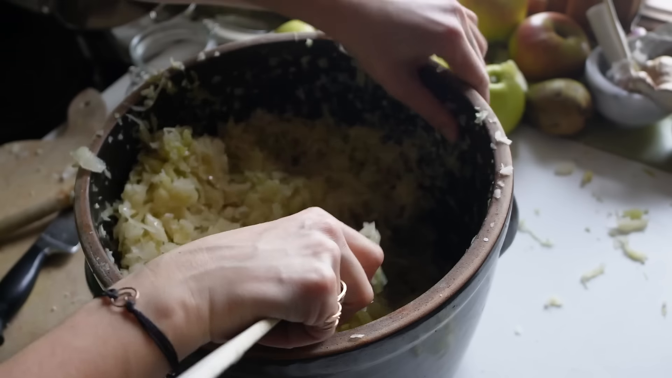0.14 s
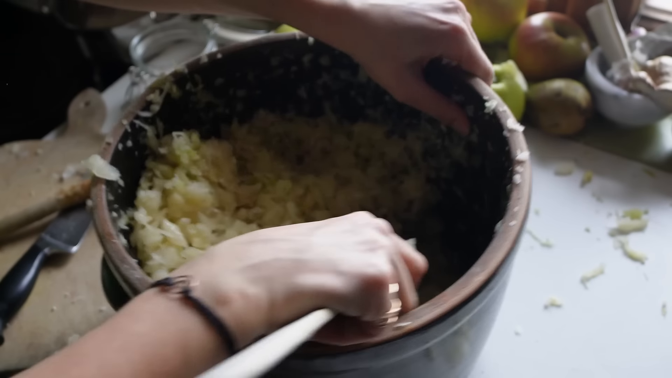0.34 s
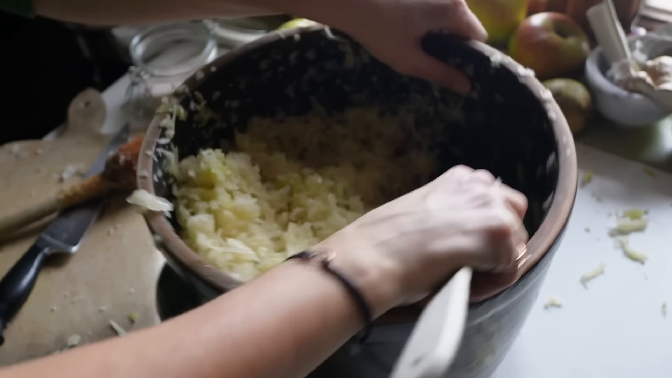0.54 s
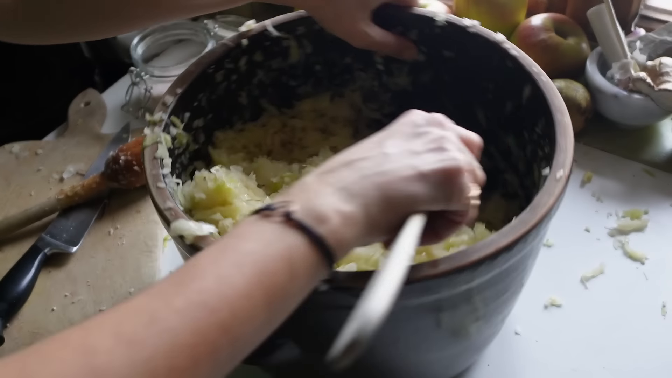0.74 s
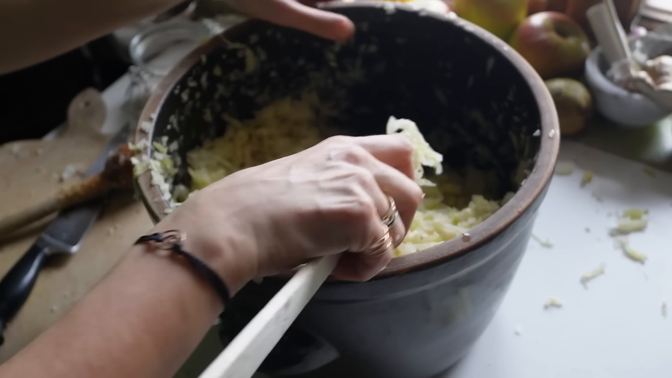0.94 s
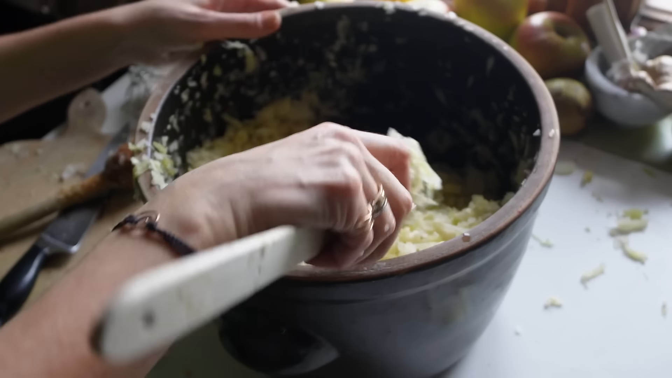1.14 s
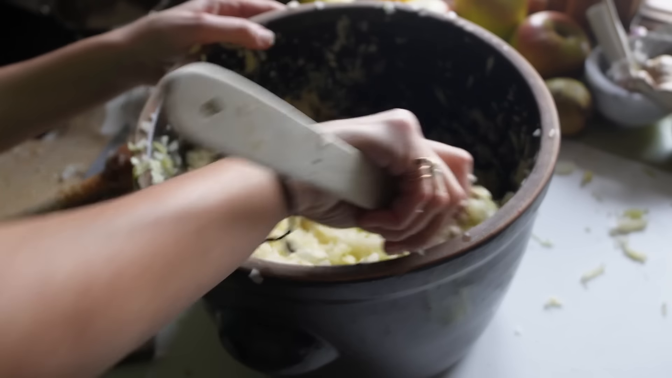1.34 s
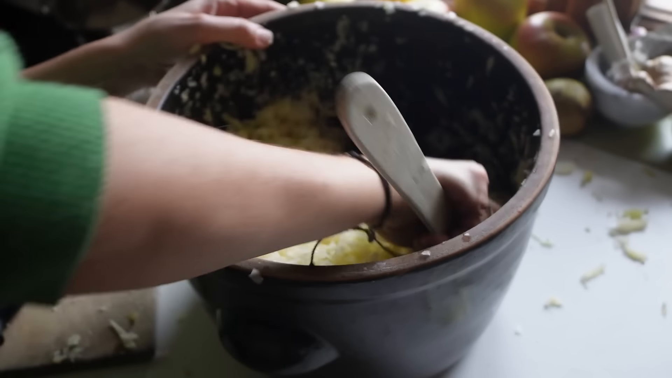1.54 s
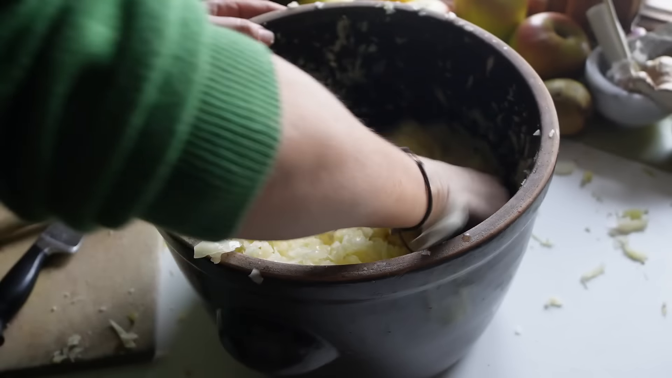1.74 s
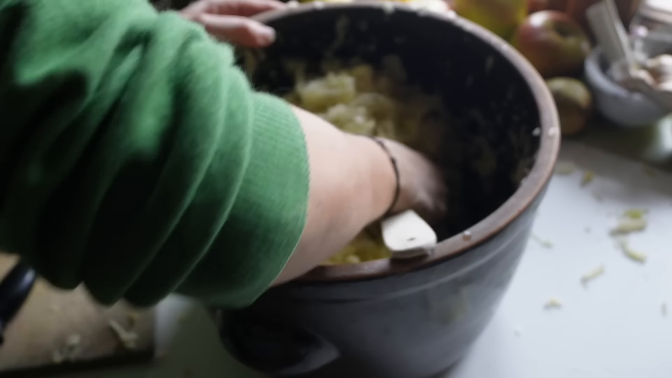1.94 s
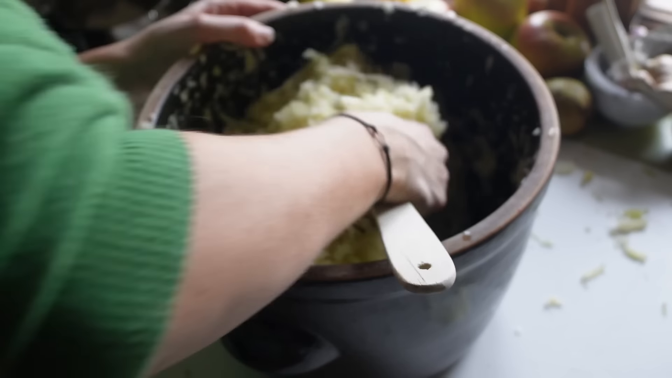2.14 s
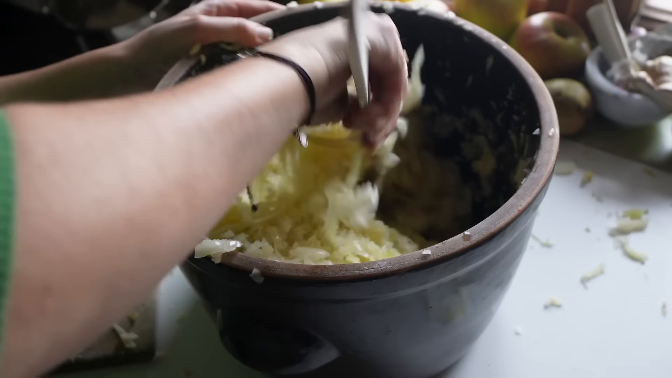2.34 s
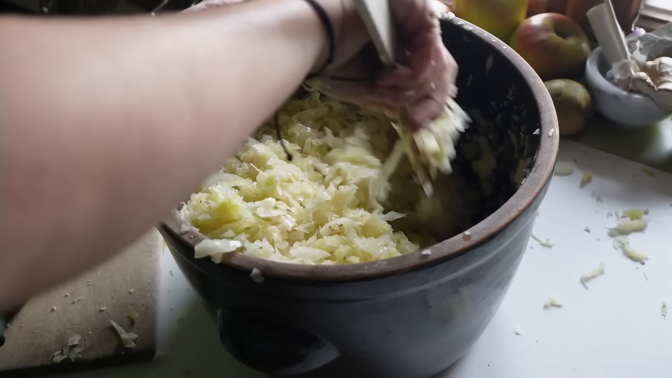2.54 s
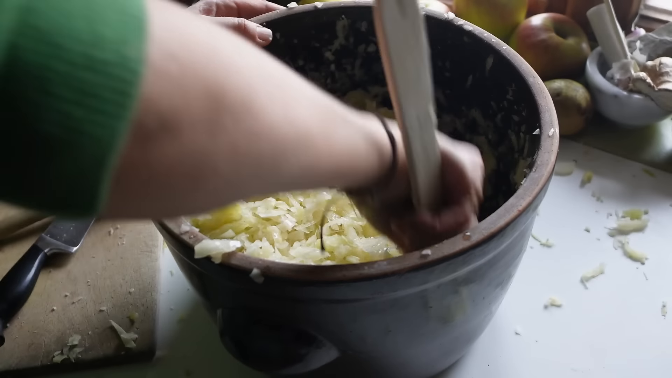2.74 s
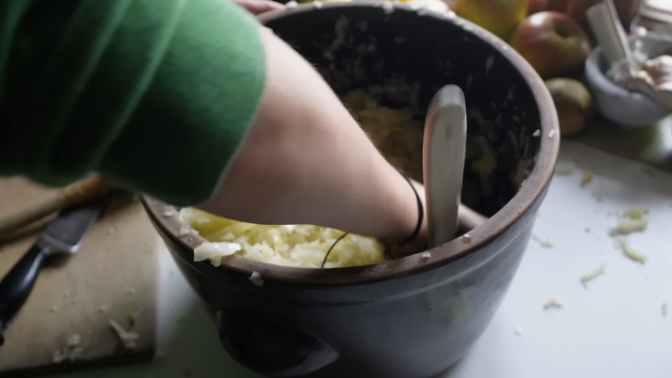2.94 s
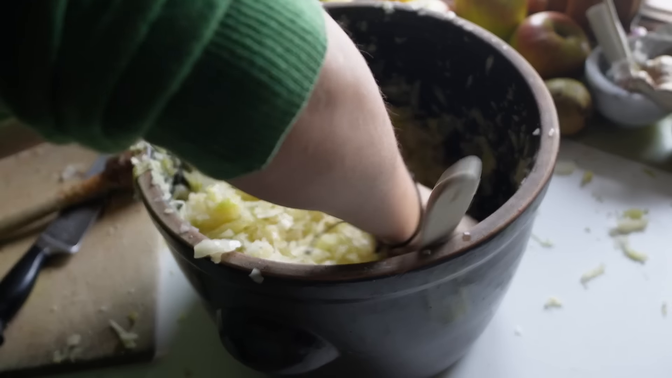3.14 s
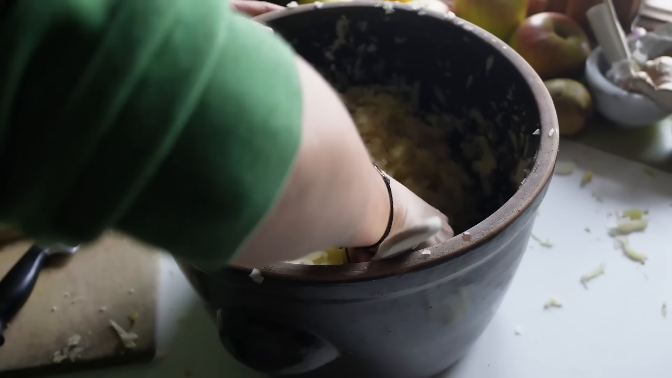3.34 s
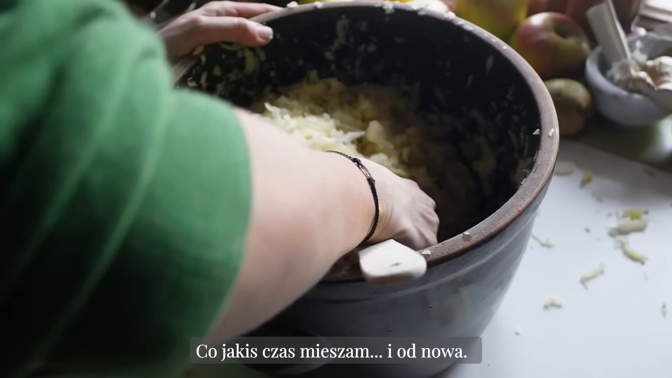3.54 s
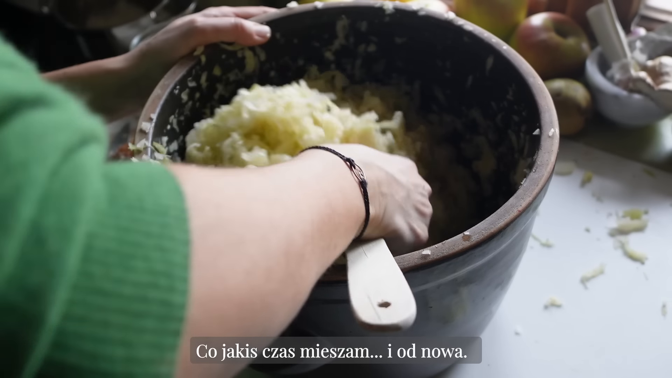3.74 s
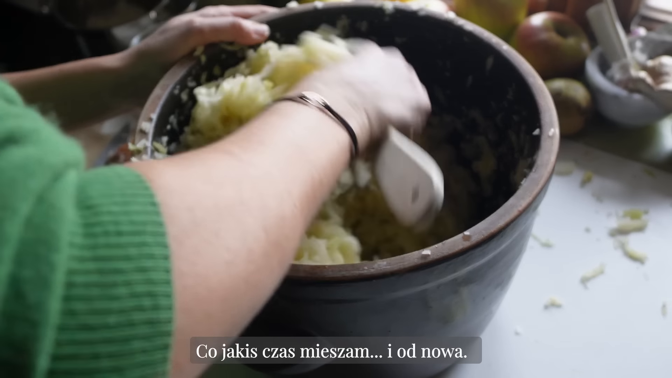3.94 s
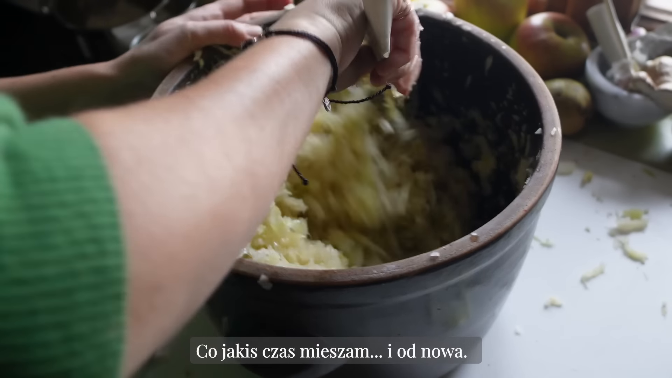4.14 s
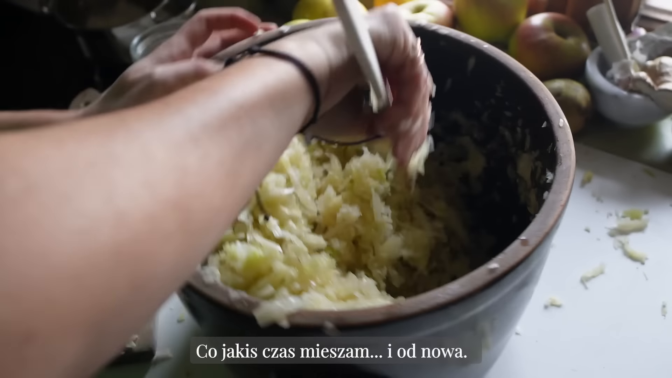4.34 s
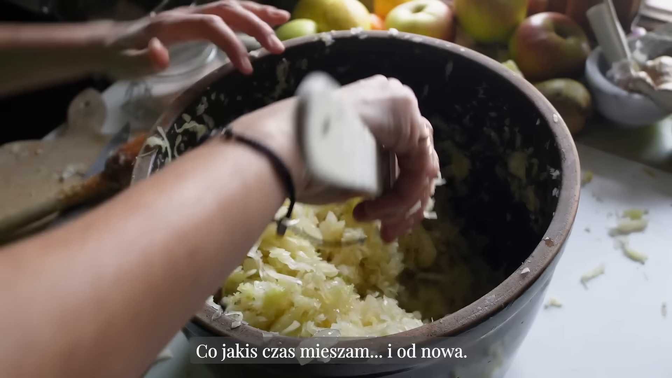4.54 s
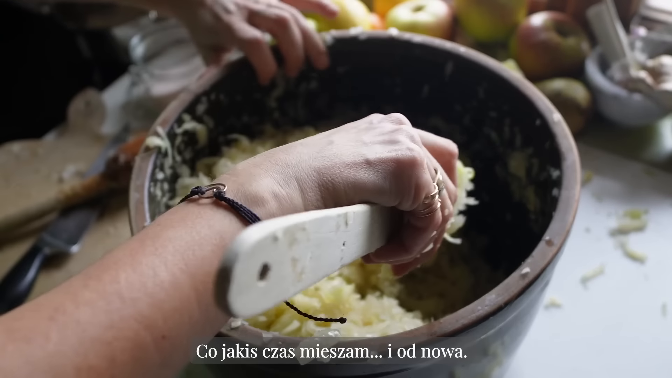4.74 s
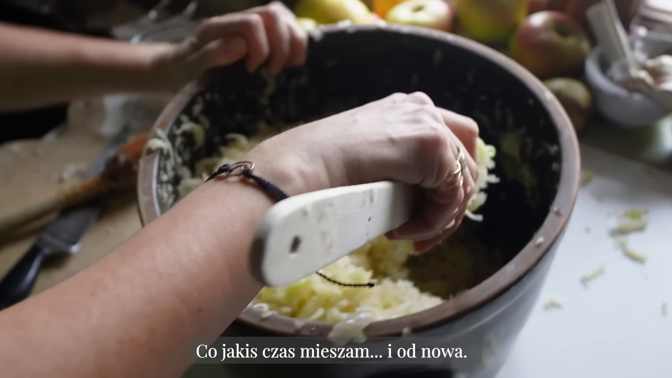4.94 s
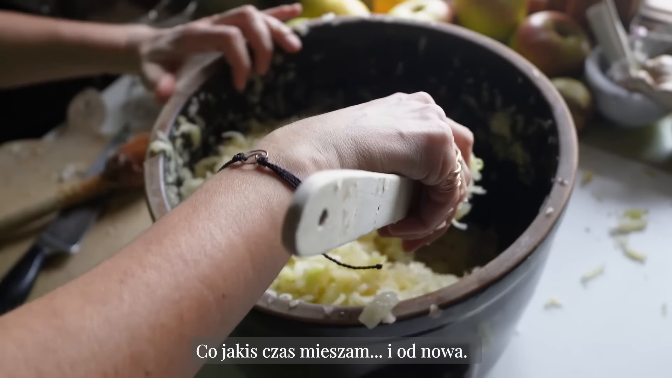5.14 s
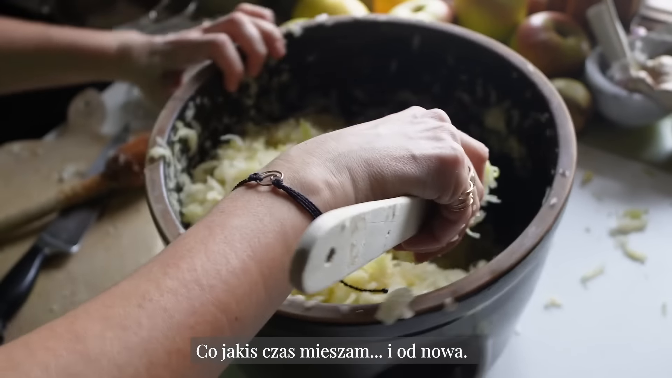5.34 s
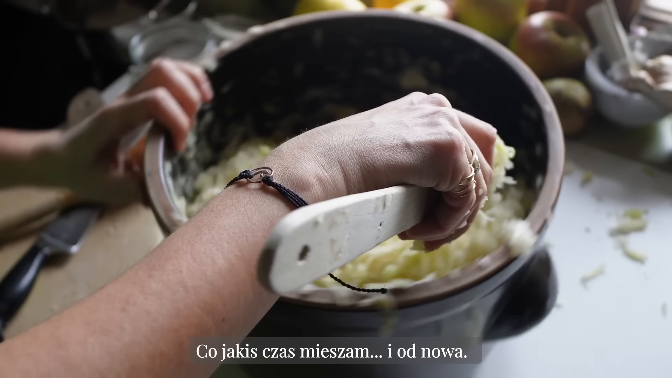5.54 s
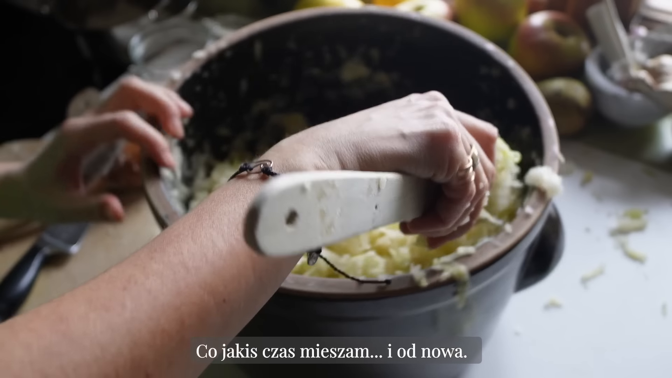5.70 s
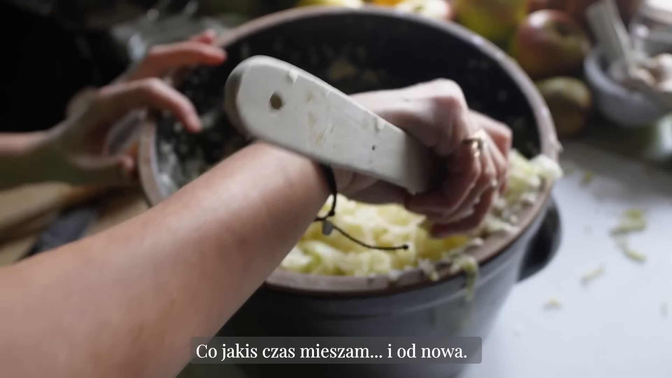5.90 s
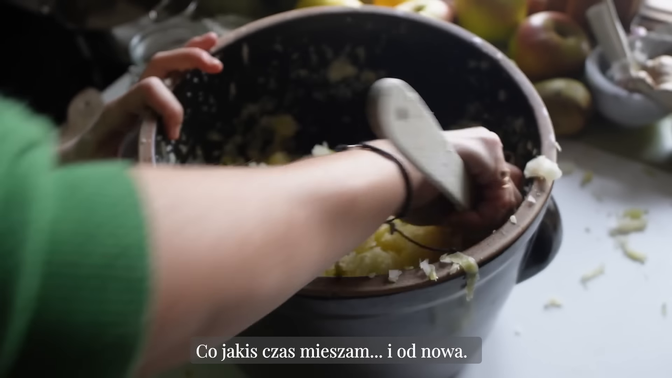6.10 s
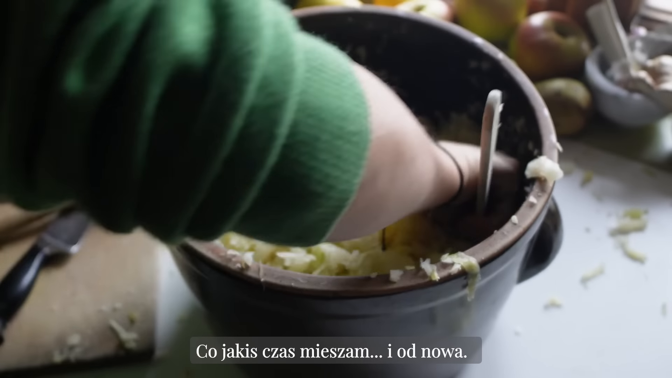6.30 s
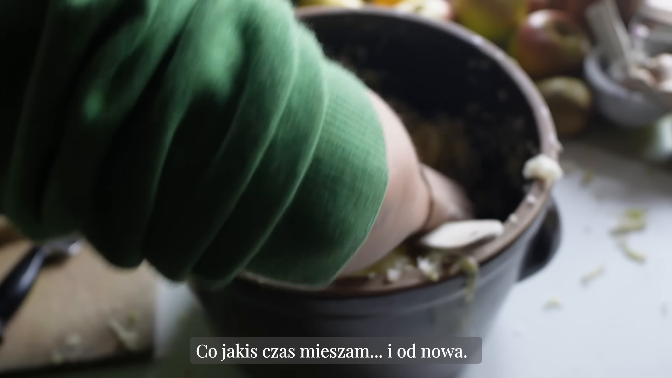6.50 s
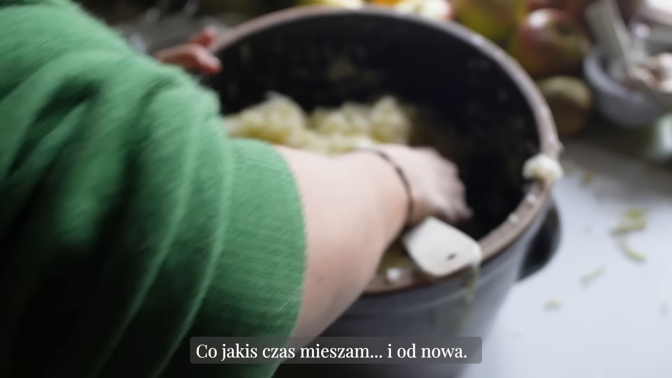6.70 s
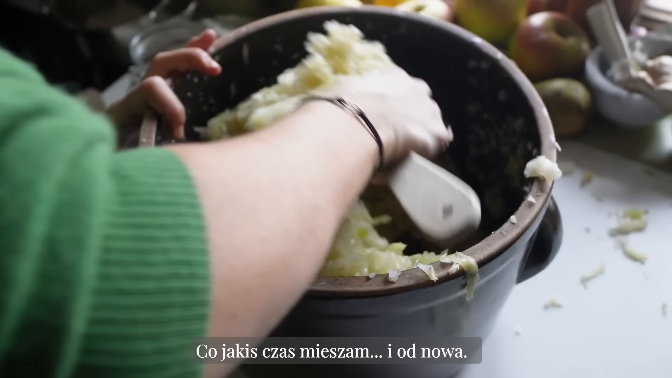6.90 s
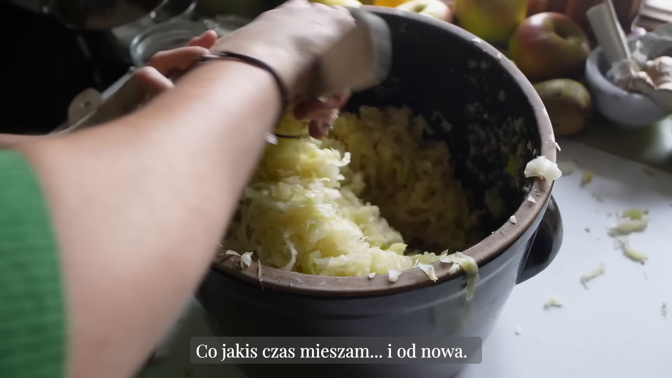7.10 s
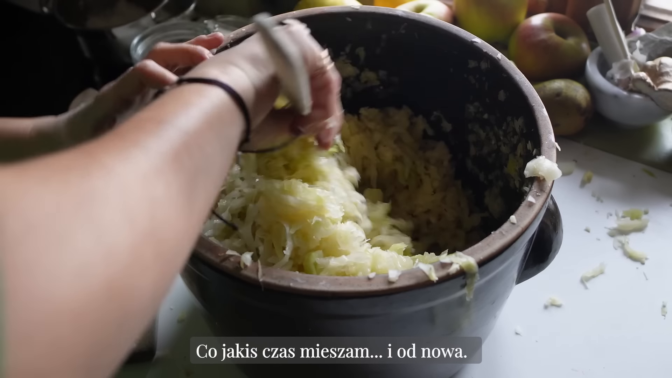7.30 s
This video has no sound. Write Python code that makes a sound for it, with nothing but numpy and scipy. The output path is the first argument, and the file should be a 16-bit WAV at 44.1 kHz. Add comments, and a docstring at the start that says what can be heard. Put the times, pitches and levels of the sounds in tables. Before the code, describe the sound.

A close microphone in a small kitchen picks up a low, steady room tone and slight reverberation. From about 0.3 to 1 second a heavy stoneware crock grinds round on a table, with dull thuds. From 1.4 to 4 seconds a hand turns wet shredded cabbage in soft, crackling squelches. A spatula scuffs and clacks on the wall near 1.8 seconds and clacks sharply at 2.7; the crock rocks with two thuds around 3 seconds. It is dragged again from 4.1 to 4.7 and from 5.3 to 5.9, each pull sinking to a growl, with a few knocks and a brief scrape near 5. Wet fingers squeak faintly around 4, 4.7 and 6.4 seconds. Mixing resumes at 6 with light taps and thuds, and the loudest clack rings briefly at 6.5. The squelching then fades to a faint wet crackle just after 7 seconds.

```python
"""A small kitchen, one microphone close to a stoneware crock of wet shredded cabbage on the table.
A hand with a flat spatula scoops and turns the shreds, which squelch and crackle; the spatula clacks and
scuffs on the wall, and wet fingers squeak faintly on the glaze. Between scoops the heavy crock is dragged
round on its foot, grinding over the table top, and rocks with dull thuds.
Behind it all lie the short answer of the room and a low, steady room tone."""
import sys
import numpy as np
from scipy import signal
from scipy.fft import rfft, irfft, next_fast_len
from scipy.io import wavfile
from scipy.ndimage import map_coordinates

SR = 44100
rng = np.random.default_rng(int(sys.argv[2]) if len(sys.argv) > 2 else 0)


def put_to_file(sound):
    """Save the sound as 16-bit audio at rate SR, in the file named by the first command-line argument."""
    columns = np.atleast_2d(sound).T  # one column per channel
    safe = np.clip(columns, -1, 1)
    whole_steps = np.round(safe * 32767)
    wavfile.write(sys.argv[1], SR, whole_steps.astype(np.int16))


N = 328986


def amp(db):
    return 10 ** (np.asarray(db) / 20)


def unit(x):
    return x / np.sqrt(np.mean(x ** 2) + 1e-20)


def along(points, hz):
    """Read (Hz, value) points along a log frequency axis."""
    freqs, values = np.transpose(points)
    return np.interp(np.log(hz + 1), np.log(freqs + 1), values)


def wobble(rate):
    """A smooth random curve, rate knots a second."""
    return map_coordinates(rng.standard_normal(int(N * rate / SR) + 4), [np.arange(N) * rate / SR])


def filtered(x, response):
    """x through a complex response, given as a function of frequency."""
    size = next_fast_len(len(x) + SR // 4)
    return irfft(rfft(x, size) * response(np.fft.rfftfreq(size, 1 / SR)), size)[:len(x)]


def causal(gain):
    """The minimum-phase response with this gain: nothing sounds before the blow."""
    cepstrum = irfft(np.log(np.maximum(gain, 1e-6)))
    half = len(cepstrum) // 2
    return np.exp(rfft(np.r_[cepstrum[0], 2 * cepstrum[1:half], cepstrum[half], np.zeros(half - 1)]))


def coloured(x, points):
    """x shaped by a (Hz, dB) curve, at rms 1."""
    return unit(filtered(x, lambda hz: causal(amp(along(points, hz)))))


def lowpass(hz, edge_hz):
    return 1 / np.sqrt(1 + (hz / edge_hz) ** 6)


def grains(rate, spread_db):
    """Random tiny impulses, rate a second, of widely varying size."""
    sizes = amp(spread_db * np.clip(rng.standard_normal(N), -3, 2.6)) * rng.choice([-1, 1], N)
    return unit(sizes * (rng.random(N) < rate / SR))


def contact(life):
    """A brief rough force pulse with an even spectrum, dying on a time scale of life seconds."""
    age = np.arange(SR // 2) / SR / life
    spectrum = rfft(rng.standard_normal(len(age)) * age * np.exp(-age))
    power = np.abs(spectrum) ** 2
    return irfft(spectrum / np.sqrt(power + .1 * np.mean(power))) * (age < 20)


def sized(x, db, span):
    """x scaled so that its energy, spread over span seconds, has this level."""
    return amp(db) * x * np.sqrt(span * SR) / np.linalg.norm(x)


def add(track, start, x):
    i = round(start * SR)
    track[i:i + len(x)] += x[:N - i]


def room_tone(level_db=-56.5):
    """Still kitchen air, far behind the crock."""
    # spectrum of the air (frequency [Hz], level [dB])
    air = [(15, -25), (25, 0.5), (80, -7), (206, -6.5), (796, -9), (911, -5.5), (988, -14), (1330, -10),
           (1440, -12), (2760, -11), (3250, -16.5), (3520, -13), (16000, -28.5)]
    return amp(level_db) * coloured(rng.standard_normal(N), air)


def kitchen(x):
    """The room answers 5 ms after the direct sound, each frequency dying at its own speed."""
    # reverberation (frequency [Hz], t60 [s])
    decay_times = [(100, 0.43), (500, 0.33), (3000, 0.4), (8000, 0.3), (15000, 0.29)]
    hz, t, noise = signal.stft(rng.standard_normal(SR // 2), SR, nperseg=256)
    tail = signal.istft(noise * amp(-60 * t / along(decay_times, hz)[:, None]), SR, nperseg=256)[1]
    return signal.fftconvolve(x, np.pad(tail / np.linalg.norm(tail), (SR // 200, 0)))[:N]


def table_top(hz):
    """The resonances of crock and table top stand out of an even response."""
    # modes of the crock standing on the table (frequency [Hz], width [Hz], lift [dB])
    modes = [(93, 12, 6.5), (194, 13, 13.3), (296, 24, 5), (328, 20, -6), (428, 16, -4), (470, 25, -10),
             (564, 16, 0), (725, 20, -5), (842, 22, 1), (1012, 16, 0), (1174, 20, 7), (1395, 30, -4),
             (1586, 30, -2), (1877, 22, 4), (2085, 25, -2), (2995, 60, -4)]
    return 1 + sum(amp(db) * 1j * hz * width / (centre ** 2 - hz ** 2 + 1j * hz * width)
                   for centre, width, db in modes)


def inside_crock(x):
    """The wall of the crock throws near sounds back."""
    # first reflections (delay [s], level [dB])
    echoes = [(.0011, -29), (.0019, -25), (.0034, -31), (.0056, -24.5), (.0087, -27.5), (0.013, -24)]
    return filtered(x, lambda hz: 1 + sum(amp(db) * np.exp(-2j * np.pi * hz * lag) for lag, db in echoes))


def dragging(judder_hz=235, grind_hz=560, grit_hz=1550, growl_db=-4, dulling_db_per_s=8):
    """Countless tiny slips of the foot shake the table; each pull starts brighter and sinks to a growl."""
    # pulls on the crock (start [s], rise [s], hold [s], fall [s], level [dB], brightness [dB],
    # judder [dB], grit [dB], hiss [dB]), the last three relative to the level
    pulls = [(0.247, .25, 0.4, 0.19, -30, -1, -14, -10.5, -19),
             (4.089, .33, 0.023, .26, -24.5, 1.5, -16.5, -13.5, -28.5),
             (4.865, 0.06, 0.11, 0.27, -36, -4.5, -5.5, -5.5, -19),
             (5.32, 0.19, 0.09, .335, -24, 3.03, -14, -15.5, -28)]
    # spectrum of the slipping foot (frequency [Hz], level [dB])
    foot = [(50, -30.5), (100, -13), (160, -0.5), (240, -11), (310, 2.5), (550, 1.5), (880, -3.5),
            (1350, -13), (2000, -13.5), (3500, -18), (6500, -28), (16000, -54)]
    # fine hiss of its unglazed clay (frequency [Hz], level [dB])
    clay = [(3000, -28.5), (7000, -19), (8200, 0), (8750, 2.5), (9600, -6), (11000, -8.5), (13500, -9),
            (16000, -21.5)]
    catching = amp(0.66 * wobble(90))
    body = filtered(coloured(grains(rate=4500, spread_db=1.5) * catching, foot), table_top)
    band = lambda low, high: unit(filtered(body, lambda hz: lowpass(hz, high) * lowpass(low, hz + 1)))
    judder, growl = band(0, judder_hz), band(judder_hz, grind_hz)
    grind, grit = band(grind_hz, grit_hz), band(grit_hz, SR)
    sand = coloured(grains(rate=8200, spread_db=5.5) * catching, clay)
    out = np.zeros(N)
    for start, rise, hold, fall, db, bright_db, judder_db, grit_db, hiss_db in pulls:
        length = rise + hold + fall
        t = np.arange(round(length * SR)) / SR
        now = round(start * SR) + np.arange(len(t))
        speed = np.clip(np.minimum(t / rise, (length - t) / fall), 0, 1)
        tilt_db = bright_db - dulling_db_per_s * (t - length / 2)
        # each band grows as its own power of the speed
        low = speed ** 0.98 * amp(judder_db) * judder[now]
        middle = speed ** 2.2 * (amp(growl_db - tilt_db) * growl[now] + amp(tilt_db) * grind[now])
        high = speed ** 2.22 * amp(grit_db + 1.3 * tilt_db) * grit[now]
        hiss = speed ** 1.9 * amp(hiss_db + 1.23 * tilt_db) * sand[now]
        add(out, start, amp(db) * (low + middle + high + hiss))
    return out


def thuds(boom_hz=106, boom_lag_s=.005, sway_hz=50, sway_db=-26, sway_t60=0.62,
          rattle_db=-14, rattle_t60=0.34):
    """The foot drops back with a knock and a rattle; the top gives with a boom and the table sways."""
    # the crock rocking (time [s], knock [dB], centre of the knock [Hz], boom [dB])
    drops = [(0.257, -38, 235, -56), (0.305, -33, 450, -42), (0.922, -30, 200, -37),
             (1.7187, -26.5, 557, -41), (1.727, -26, 198, -55), (1.793, -35, 514, -45),
             (1.935, -39.5, 220, -58), (3.014, -22, 450, -36), (3.18, -22.5, 393, -26.5),
             (4.067, -42.5, 380, -60), (4.23, -29.5, 380, -60), (4.927, -30, 500, -32),
             (4.962, -25.5, 280, -28), (5.072, -24, 280, -52), (6.336, -28.5, 360, -35.5),
             (6.473, -29, 352, -56), (6.492, -25, 434, -38)]
    out, t = np.zeros(N), np.arange(SR // 2) / SR
    sway = np.sin(2 * np.pi * sway_hz * t) * amp(sway_db - 60 * t / sway_t60) * (1 - np.exp(-t / 0.0055))
    for start, knock_db, knock_hz, boom_db in drops:
        for lag, db, centre in [(0, knock_db, knock_hz), (boom_lag_s, boom_db, boom_hz)]:
            push = sized(contact(life=.0026), 0, span=.006)
            rattle = rng.standard_normal(len(t)) * amp(rattle_db - 60 * t / rattle_t60)
            hump = lambda hz: (hz * centre) ** 2 / (hz ** 4 + centre ** 4) * lowpass(hz, 3 * centre)
            softness = lambda hz: causal(hump(hz) + amp(-15.5) * lowpass(hz, 180))
            thud = filtered(push + rattle, lambda hz: softness(hz) * table_top(hz))
            add(out, start + lag, sized(thud, db, span=0.0057))
        add(out, start, amp(knock_db) * sway)
    return out


def squeaks():
    """Uneven stick and slip of wet fingers on the glaze makes a thin, rough whistle."""
    # finger slips (start [s], length [s], pitch [Hz], level [dB])
    slips = [(3.979, 0.13, 2780, -53), (4.594, 0.21, 2640, -56), (6.348, 0.13, 2635, -46)]
    out = np.zeros(N)
    for start, length, hz, db in slips:
        swell = np.hanning(round(length * SR)) ** .5
        pitch = hz * (1 + .06 * wobble(900)[:len(swell)])
        add(out, start, amp(db) * swell * np.sin(2 * np.pi * np.cumsum(pitch) / SR))
    return out


def droplets(rate, pitch_hz, octaves, cycles, spread_db, samples=300):
    """Tiny wet snaps in clumps, each ringing for a few cycles at its own rising pitch."""
    starts = np.flatnonzero(rng.random(N) < rate / SR * amp(4 * wobble(25)))
    scatter = np.clip(rng.standard_normal((len(starts), 2)), -2.3, 2.3)
    hz = np.minimum(pitch_hz * 2 ** (octaves * scatter[:, :1]), SR / 3)
    turns = hz * np.arange(samples) / SR
    envelopes = amp(spread_db * scatter[:, 1:]) * np.exp(-turns / cycles)
    rings = envelopes * np.sin(2 * np.pi * turns * (1 + 0.016 * turns / cycles))
    positions = starts[:, None] + np.arange(samples)
    return unit(np.bincount(positions.ravel(), rings.ravel(), N)[:N])


def cabbage(rub_db=-2, snap_db=-6.5, fizz_db=-6, burst_db=-4, fade_db=21, roundness=1.33):
    """Wet shreds rub and snap under the fingers while films of juice fizz and burst, in clumps."""
    # the hand pushes, lifts or lets fall (peak time [s], rise [s], fall [s], squelch [dB], crackle [dB])
    handfuls = [(0.28, .32, 0.13, -60, -57), (1.45, 0.09, .12, -54, -54), (1.69, 0.28, 0.33, -38.5, -55.5),
                (2.03, 0.44, 0.25, -40.5, -58), (2.42, 0.89, 0.4, -58.5, -59), (2.96, 0.24, .25, -44, -61),
                (3.5, 0.39, 0.66, -45.5, -74), (4.17, 0.86, .2, -54.5, -58), (6.04, 0.1, 0.98, -56.5, -50),
                (6.28, 0.2, 0.29, -42, -54), (6.45, 0.082, 0.25, -40, -51), (6.7, 0.24, 0.49, -48, -61),
                (7.25, 1, 0.98, -61, -64.5)]
    # spectrum of rubbing shreds (frequency [Hz], level [dB])
    shreds = [(71, -78), (120, -3), (256, -20), (388, 6.5), (474, 0), (1090, 0), (1280, -7.5), (1970, -4),
              (2160, -6.5), (4700, -13.5), (9000, -29), (11700, -71), (19800, -120)]
    # spectrum of fizzing juice (frequency [Hz], level [dB])
    juice = [(1500, -20), (3000, 12), (5000, 2.5), (8300, 10), (10500, -7), (15500, -3.5)]
    clumps = unit(amp(2.2 * wobble(32)))
    rub = coloured(grains(rate=2000, spread_db=3.5), shreds)
    snaps = droplets(rate=420, pitch_hz=1700, octaves=.65, cycles=2.2, spread_db=6)
    fizz = coloured(grains(rate=1500, spread_db=4), juice)
    bursts = droplets(rate=360, pitch_hz=7400, octaves=.55, cycles=1.8, spread_db=6.2)
    squelch = clumps * (amp(rub_db) * rub + amp(snap_db) * snaps)
    crackle = clumps * (amp(fizz_db) * fizz + amp(burst_db) * bursts)
    t = np.arange(N) / SR
    pressing, wetness = np.zeros(N), np.zeros(N)
    for peak, rise, fall, squelch_db, crackle_db in handfuls:
        # fade_db down at the ends of rise and fall; roundness 1 is a pointed top, 2 a round one
        swell = amp(-fade_db * np.maximum((peak - t) / rise, (t - peak) / fall) ** roundness)
        pressing = np.maximum(pressing, amp(squelch_db) * swell)
        wetness = np.maximum(wetness, amp(crackle_db) * swell)
    return pressing * squelch + wetness * crackle


def scuffs():
    """The spatula chatters briefly along the wall."""
    # slides of the spatula (start [s], length [s], level [dB])
    slides = [(1.361, 0.05, -44), (1.787, 0.11, -28.5), (2.018, 0.097, -39.5), (2.858, 0.047, -44.5),
              (2.975, 0.071, -43), (3.192, 0.06, -41.5), (5.981, 0.06, -56), (6.256, 0.03, -46)]
    # spectrum of the scrape (frequency [Hz], level [dB])
    scrape = [(300, -6), (1200, 11), (3500, 2.5), (5500, -4.5), (8000, -4.5), (11000, -16), (15500, -15)]
    stroke = np.zeros(N)
    for start, length, db in slides:
        progress = np.linspace(0, 1, round(length * SR))
        add(stroke, start, amp(db) * np.abs(np.sin(np.pi * progress ** 1.16)))
    chatter = grains(rate=1500, spread_db=4)
    return stroke * coloured(inside_crock(chatter), scrape)


def clacks(hollow_db=-5, hollow_t60=0.23, rattle_db=-9, rattle_t60=0.087):
    """Each tap of the spatula is a hard click and short rattle; it rings the wall and echoes inside."""
    # spatula on stoneware (time [s], click [dB], tilt above 1 kHz [dB/octave], ring [dB])
    taps = [(1.369, -36.5, 7, -44), (1.7201, -30.5, 1, -65), (1.8130, -22, -6, -20.5),
            (1.957, -34, -27, -42), (2.393, -45, -14, -63), (2.7409, -11, -4, -41), (2.9534, -36, -4, -60),
            (2.9787, -30, 10, -40), (3.015, -31, 5, -59), (4.154, -42, 9, -70), (4.9240, -40, 10, -37),
            (5.987, -37.5, 2, -71), (6.018, -33.5, 5.5, -73), (6.045, -37, 5, -67), (6.2548, -21, 3, -61),
            (6.2569, -22, 3, -44), (6.491, -18, 0.5, -27.5), (6.4923, -5.5, -4, -17.5),
            (6.701, -58, -11, -41.5), (6.8002, -39.5, -15, -62), (6.8355, -42.5, 3, -61)]
    # spectrum of the click (frequency [Hz], level [dB])
    click_colour = [(200, -24.5), (1000, -32), (2000, -13), (2650, 2.5), (3100, 0.5), (3700, 2),
                    (4400, 4.5), (5200, -8.5), (6300, -6.5), (8400, -4.5), (10500, -18), (16000, -20)]
    # modes of the stoneware wall (frequency [Hz], level [dB], t60 [s])
    wall_modes = [(419.6, -8.5, 0.26), (467, -14.5, 0.21), (1080, 5, 0.1), (1556, -16, 0.22),
                  (1922, -18, 0.21), (1957, -7.5, 0.22), (2000, -13, 0.06), (2250, -13.5, 0.13),
                  (2300, 4, 0.068), (2350, -28, 0.42), (2690, -28, .17), (3030, -7.5, 0.13),
                  (3400, -12, 0.13), (3680, -24, .17), (3320, -26, .15), (3850, -29, .15),
                  (4060, -27, 0.14), (5310, -14, 0.12)]
    # spectrum of the echoes in the crock (frequency [Hz], level [dB])
    cavity = [(80, -20), (350, 4.5), (900, 0.5), (1150, 6.5), (1500, -11.5), (2200, 7), (4000, -6),
              (4800, -6.5), (8000, -12), (15000, -29.5)]
    out, t = np.zeros(N), np.arange(SR // 2) / SR
    attack = 1 - np.exp(-t / 0.00018)
    octaves = lambda hz: np.log2(np.maximum(hz, 1000) / 3500)
    for start, db, tilt_db, ring_db in taps:
        hardness = lambda hz: causal(amp(along(click_colour, hz) + tilt_db * octaves(hz)))
        rattle = rng.standard_normal(len(t)) * amp(-60 * t / rattle_t60)
        blow = inside_crock(contact(life=.00036))
        force = unit(blow) + amp(rattle_db) * unit(rattle)
        click = sized(filtered(force, hardness), db, span=0.0021)
        wall = np.zeros(len(t))
        for hz, level, t60 in wall_modes:
            decay = amp(level + rng.normal(0, 0.42) - 60 * t / t60)
            wall += decay * np.sin(2 * np.pi * (hz * t + rng.random()))
        hollow = coloured(rng.standard_normal(len(t)), cavity) * amp(hollow_db - 60 * t / hollow_t60)
        add(out, start, click + amp(ring_db) * (wall + hollow) * attack)
    return out


def scene():
    """Close on the crock; the sounds under it carry further into the room than those inside it."""
    inside = inside_crock(cabbage()) + clacks() + scuffs() + squeaks()
    under = dragging() + thuds()
    air = room_tone()
    return inside + under + kitchen(amp(-12.5) * inside + amp(-7.5) * under) + air


def record(dry, top_hz=16100):
    """At the microphone the hardest clack clips at full scale; nothing is kept above top_hz."""
    return filtered(np.clip(dry, -1, 1), lambda hz: hz < top_hz)


dry = scene()
out = record(dry)
put_to_file(out)
```